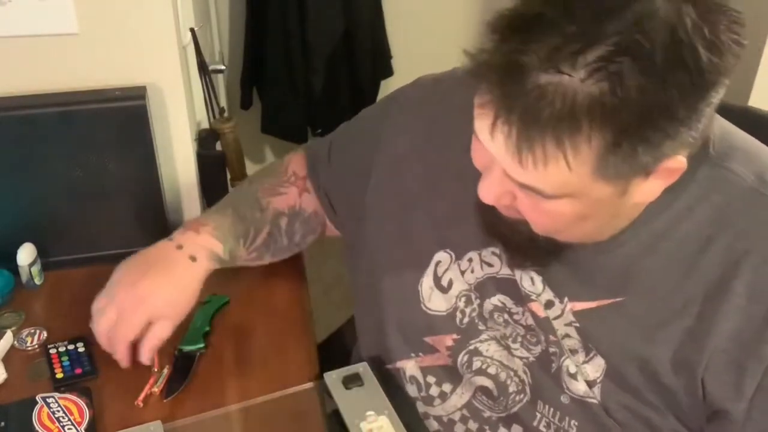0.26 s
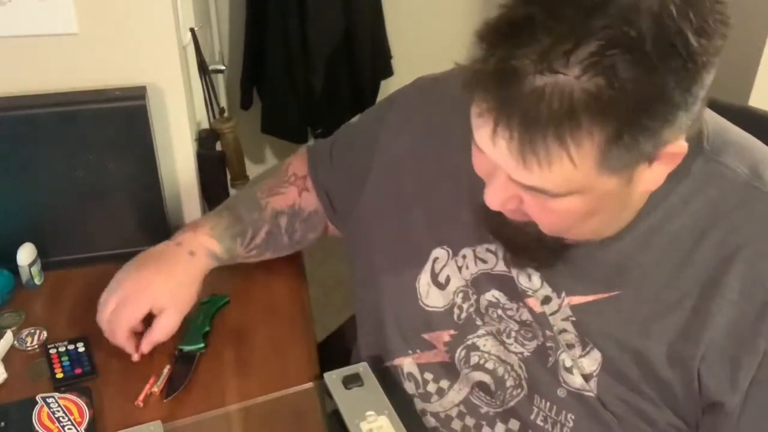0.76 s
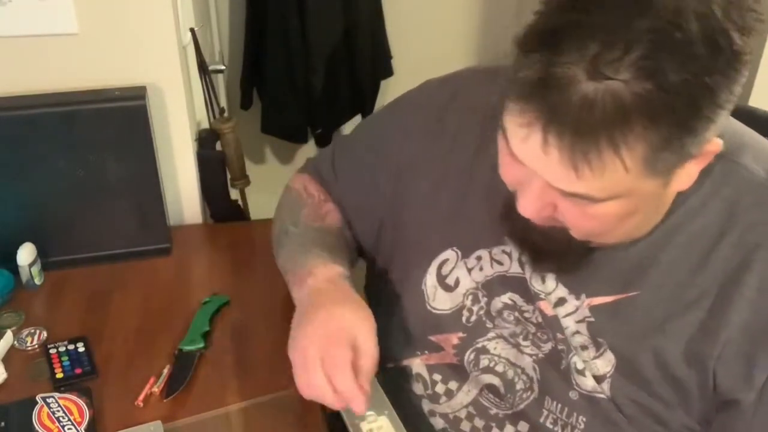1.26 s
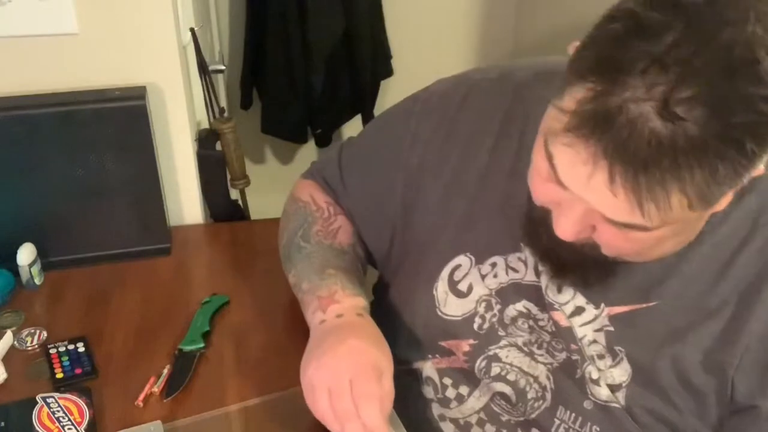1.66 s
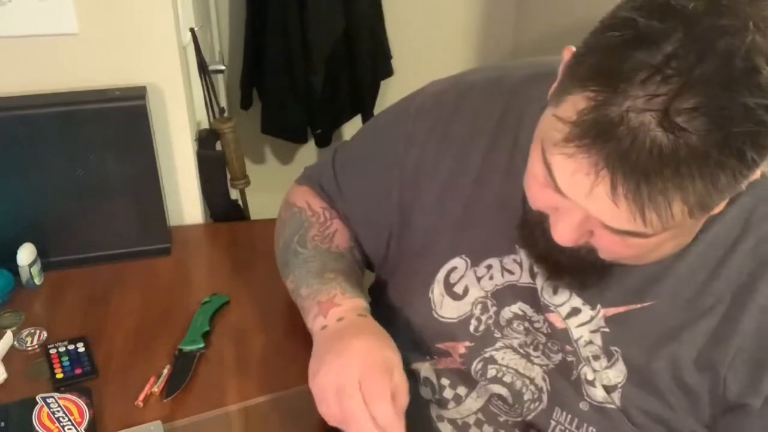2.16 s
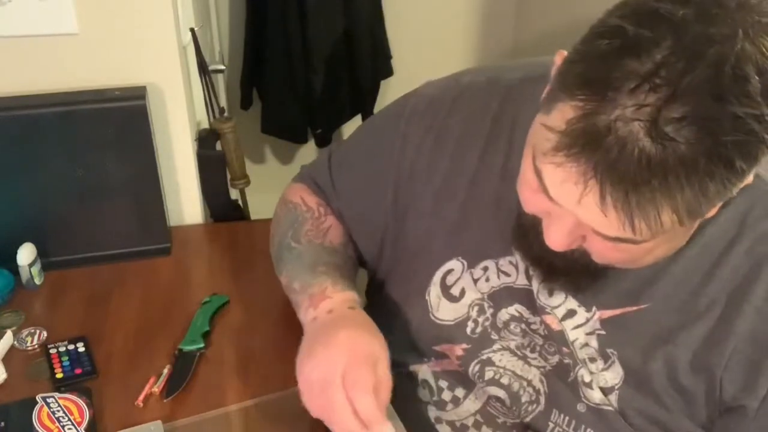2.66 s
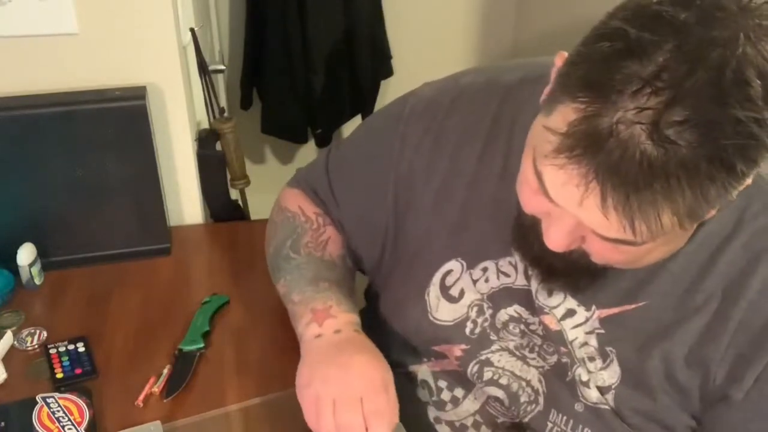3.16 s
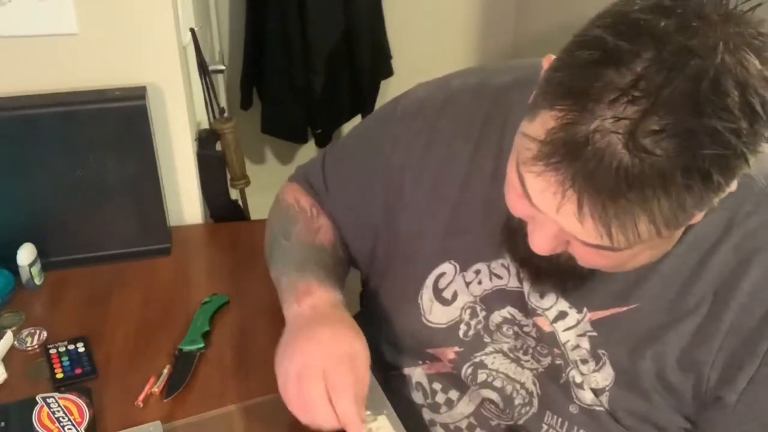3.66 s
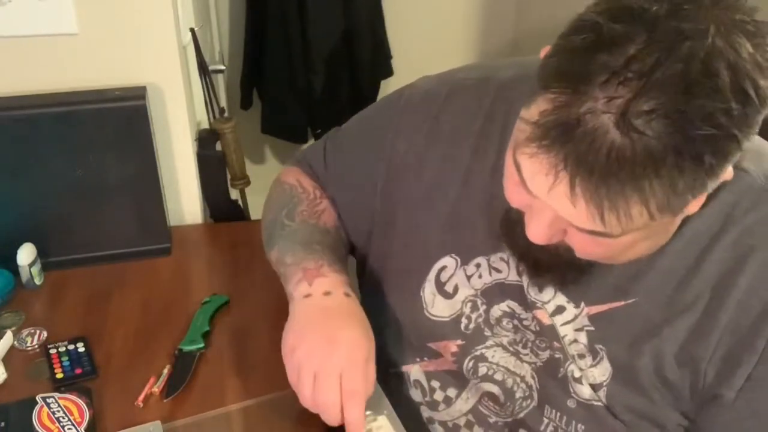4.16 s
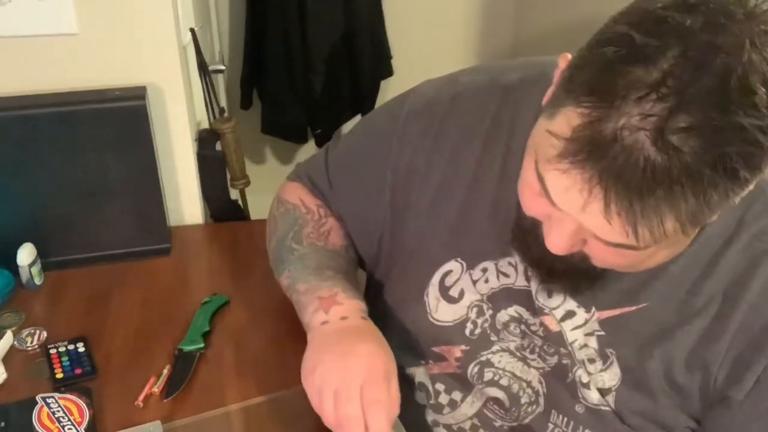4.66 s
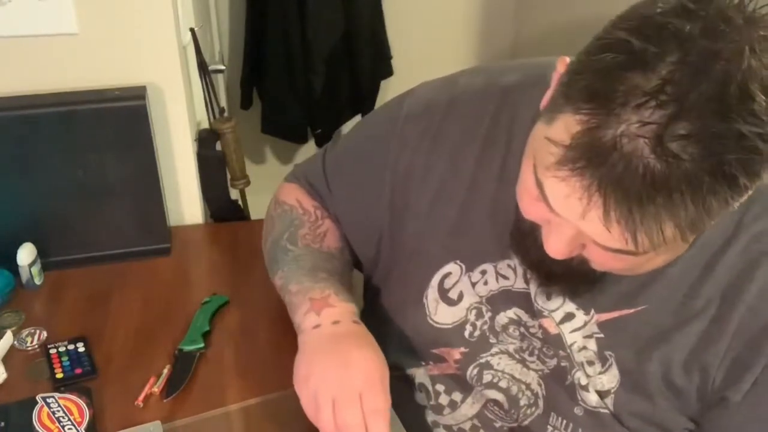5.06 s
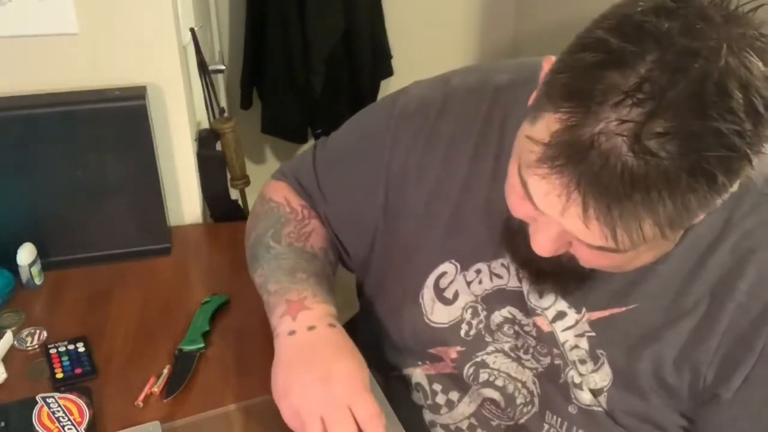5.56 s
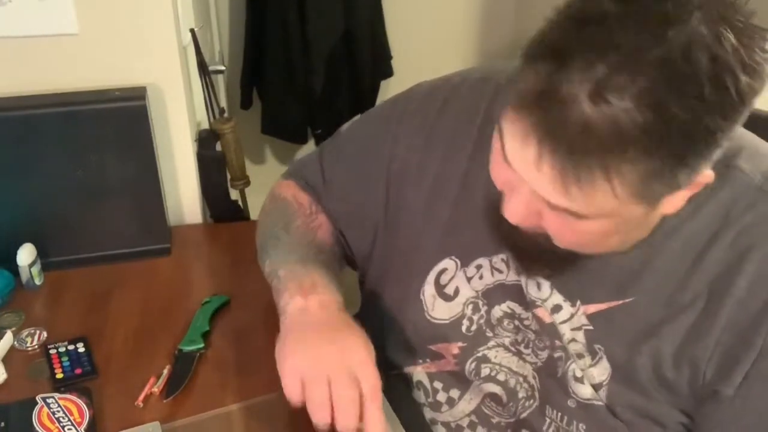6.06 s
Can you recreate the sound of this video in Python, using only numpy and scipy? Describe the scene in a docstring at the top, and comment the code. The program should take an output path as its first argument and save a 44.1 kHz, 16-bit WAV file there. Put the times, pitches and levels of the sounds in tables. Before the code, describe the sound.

Close up in a small, quiet room, fingers fit batteries into a thin plastic case. A soft tap on the wooden desk comes first, then light clicks and brief scrapes that build to loud snaps about halfway through. Irregular clicking goes on, with steel ticking against steel and the hardest pushes thumping the desk, ending in a fast run of clicks. A faint low hum and hiss lie underneath.

```python
"""Batteries into a plastic compartment

Fingers pick a battery off a wooden desk and push cells into a plastic case. Ticks, snaps and short
rattles ring its body and thin walls, steel cracks on steel, skin and metal scuff the plastic, and hard
pushes thump the desk. A small furnished room answers over low rumble, faint wavering hums and hiss."""
import sys
import numpy as np
from scipy import signal
from scipy.fft import rfft, irfft, next_fast_len
from scipy.io import wavfile
from scipy.ndimage import uniform_filter1d, map_coordinates

SR = 44100
rng = np.random.default_rng(int(sys.argv[2]) if len(sys.argv) > 2 else 0)


def dump(signal):
    """Clip the signal to [-1, 1] and save it as 16-bit WAV at the path in sys.argv[1]."""
    limited = np.clip(np.atleast_2d(signal).T, -1, 1)
    pcm = np.round(limited * 32767).astype(np.int16)
    wavfile.write(sys.argv[1], SR, pcm)


N = 278712


def amp(db):
    return 10 ** (np.asarray(db) / 20)


def unit_rms(x):
    return x / np.sqrt(np.mean(x ** 2) + 1e-20)


def unit_peak(x):
    return x / np.abs(x).max()


def log_interp(points, hz):
    """(frequency [Hz], value) points, read on a log axis."""
    knots_hz, values = np.transpose(points)
    return np.interp(np.log(hz + 1), np.log(knots_hz + 1), values)


def envelopes(rows):
    """One per-sample curve for each column after time."""
    times_s, *columns = np.transpose(rows)
    return [np.interp(np.arange(N) / SR, times_s, column) for column in columns]


def wobble(rate_hz):
    """Smooth random curve, rate_hz knots a second."""
    knots = rng.standard_normal(int(N * rate_hz / SR) + 4)
    return map_coordinates(knots, [np.arange(N) * rate_hz / SR])


def filtered(x, response):
    """x through a complex frequency response."""
    n = x.shape[-1]
    n_fft = next_fast_len(n + min(8192, n // 3))
    return irfft(rfft(x, n_fft) * response(np.fft.rfftfreq(n_fft, 1 / SR)), n_fft)[..., :n]


def resonances(modes, scatter_db=0):
    """Causal response of damped modes, alternating in sign, gains scattered at random."""
    offset_db = scatter_db * rng.standard_normal(len(modes))
    return lambda f: sum(
        (-1) ** k * amp(db + offset_db[k]) * 1j * f * width_hz / (hz * hz - f * f + 1j * f * width_hz)
        for k, (hz, width_hz, db) in enumerate(modes))


# Room sound, left against right: (frequency [Hz], coherence [0..1])
COHERENCE = [(60, 0.97), (200, .88), (400, 0.79), (700, 0.48), (1300, 0.33), (2400, 0.024), (5000, 0)]
def diffuse_stereo(x):
    """Two independent signals to left and right, alike in the bass."""
    def weights(hz):
        angle = np.arccos(np.clip(log_interp(COHERENCE, hz), -1, 1)) / 2
        return np.array([np.cos(angle), np.sin(angle)])
    mid, side = filtered(x, weights)
    return np.array([mid + side, mid - side])


def noise_band(hz, width_hz):
    """Narrow stereo noise, unit RMS."""
    noise = rng.standard_normal((2, N))
    return unit_rms(diffuse_stereo(filtered(noise, lambda f: resonances([(hz, width_hz, 0)])(f) ** 2)))


# House rumble: (time [s], deep band [dB], upper band [dB])
RUMBLE_LEVELS = [(0, -69, -62.5), (.9, -68.5, -61), (2.2, -65.5, -71), (2.43, -60, -63), (2.96, -67, -69.5),
                 (3.38, -59, -52), (3.7, -59, -70.5), (3.99, -62.5, -64), (4.21, -54.5, -58),
                 (4.36, -55.5, -82.5), (4.63, -64.5, -65.5), (5.37, -60.5, -61.5), (6.32, -65.5, -61)]
def rumble():
    """Deep and upper house rumble, wavering slightly."""
    deep_db, upper_db = envelopes(RUMBLE_LEVELS)
    deep = noise_band(hz=38.74, width_hz=27)
    upper = noise_band(hz=69.1, width_hz=21) + 0.42 * noise_band(hz=115, width_hz=39)
    return amp(wobble(9)) * (amp(deep_db) * deep + amp(upper_db) * upper)


# Hums: (time [s], low [dB], middle [dB], high [dB])
HUM_LEVELS = [(0, -75.5, -105, -90), (.5, -72, -84, -91), (.9, -81, -89, -105), (1.1, -69, -89, -105),
              (1.25, -94, -97.5, -105), (3.8, -85, -94, -105), (6.32, -82, -98, -105)]
def hums():
    """Three narrow noise bands that come and go."""
    low_db, middle_db, high_db = envelopes(HUM_LEVELS)
    return (amp(low_db) * noise_band(hz=311, width_hz=25)
            + amp(middle_db) * noise_band(hz=770, width_hz=60)
            + amp(high_db) * noise_band(hz=1470, width_hz=30))


# Room hiss: (frequency [Hz], relative density [dB])
HISS_SPECTRUM = [(82, -41), (140, -16.5), (212, -14), (268, -16), (302, -12.5), (367, -20), (625, -22.5),
                 (777, -18.5), (1170, -27), (1610, -28.5), (2850, -37), (3080, -37), (10900, -40.5),
                 (15500, -54.5)]
def hiss(level_db=-76):
    """Faint broadband noise, drifting in level."""
    noise = filtered(rng.standard_normal((2, N)), lambda hz: amp(log_interp(HISS_SPECTRUM, hz)))
    return amp(level_db + wobble(1.1)) * unit_rms(diffuse_stereo(noise))


def uneven_echoes(shape, depth_db):
    """Random gain over frequency and time: few surfaces echo unevenly."""
    field = uniform_filter1d(rng.standard_normal(shape), size=2, axis=0)
    return amp(depth_db * unit_rms(uniform_filter1d(field, size=14, axis=1)))


# Room decay: (frequency [Hz], T60 [s])
ROOM_T60 = [(300, 0.9), (1100, 0.47), (3000, 0.52), (8000, 0.36), (15000, 0.29)]
# Reverb send: (frequency [Hz], gain [dB])
ROOM_SEND = [(300, 3.5), (650, -9.5), (1200, -12.5), (3000, -9.5), (7000, -12.5), (14000, -15)]
def room(x):
    """Each band's energy drains as noise: fast from near surfaces, slowly from the room."""
    frames = dict(fs=SR, nperseg=512, noverlap=384)
    delayed = np.pad(x, (400, 0))[:N]
    hz, t, spectrum = signal.stft(delayed, **frames)
    power = uniform_filter1d(np.abs(spectrum) ** 2, size=2, axis=0)

    def drain(t60_s):
        retained = amp(-120 * t[1] / t60_s)  # power ratio per hop
        return np.array([signal.lfilter([1 - k], [1, -k], row) for k, row in zip(retained, power)])

    t60_s = log_interp(ROOM_T60, hz)
    energy = np.abs(drain(t60_s) + amp(6.5) * drain(0.36 * t60_s))
    noise = signal.stft(rng.standard_normal((2, N)), **frames)[2]
    noise /= np.sqrt(np.mean(np.abs(noise) ** 2))
    tail = noise * np.sqrt(energy) * amp(log_interp(ROOM_SEND, hz))[:, None]
    tail *= uneven_echoes(energy.shape, depth_db=2)
    return diffuse_stereo(signal.istft(tail, **frames)[1][:, :N])


# Desk top: (frequency [Hz], gain [dB], T60 [s])
DESK_MODES = [(70.6, -11.5, 0.056), (95, 5, 0.13), (161, -0.5, .12), (207, -5, 0.056), (287, -0.5, 0.1),
              (394.4, -3, 0.083), (504.7, 5.5, 0.023)]
# Pushes reaching the desk: (time [s], thump [dB], knock [dB])
DESK_PUSHES = [(0.535, -49, -34.5), (0.547, -62, -36.5), (1.843, -52.5, -41.5), (2.32, -54, -45),
               (2.535, -47, -53.5), (3.153, -58, -40), (3.222, -29, -26.5), (3.271, -55, -34),
               (3.388, -37.5, -31.5), (3.593, -49.5, -47.5), (4.124, -50, -65.5), (4.502, -45, -41),
               (4.553, -48, -41), (4.607, -53.5, -49), (4.899, -51, -43.5), (4.956, -43.5, -41),
               (5.14, -39, -48), (5.281, -33.5, -33), (5.3, -54, -38), (5.417, -35.5, -54.5),
               (5.789, -23, -32), (6.03, -42, -62), (6.051, -33.5, -42), (6.065, -35, -32)]
def desk_thumps(rise_s=0.014, scatter_db=1.2):
    """The desk top gives slowly, then rings: deep modes thump, upper ones knock."""
    desk, t = np.zeros((2, N + SR)), np.arange(SR // 3) / SR
    for start_s, thump_db, knock_db in DESK_PUSHES:
        offsets_db = scatter_db * rng.standard_normal((len(DESK_MODES), 2, 1))
        ring = np.zeros((2, len(t)))
        for (hz, gain_db, t60_s), offset_db in zip(DESK_MODES, offsets_db):
            level_db = gain_db + (thump_db if hz < 200 else knock_db) + offset_db
            ring += amp(level_db - 60 * t / t60_s) * np.sin(2 * np.pi * hz * t)
        desk[:, round(start_s * SR):][:, :len(t)] += ring * (1 - np.exp(-t / rise_s))
    return desk[:, :N]


# Steel on steel: (frequency [Hz], gain [dB])
STEEL_SPECTRUM = [(3000, -39.5), (4500, -9.5), (6000, -3.5), (8000, -2.5), (10500, -9), (13000, -12),
                  (15500, -15), (16000, -13)]
def steel_treble(x):
    """The bright colour of the steel contacts."""
    return filtered(x, lambda hz: amp(log_interp(STEEL_SPECTRUM, hz)) * (hz > 3000))


def bending_waves(x, lag_s):
    """Dispersion: highs travel fastest; 600 Hz trails 2400 Hz by lag_s."""
    return filtered(x, lambda hz: np.exp(-2j * np.pi * lag_s * (4 * np.sqrt(600 * hz) - hz)))


# Case body and thin walls: (frequency [Hz], width [Hz], gain [dB])
BODY_MODES = [(630, 42, -5.5), (929, 312, -8.5), (950.6, 104.6, -1), (1174, 50, -8), (1397, 233, -2.5),
              (1409.3, 186, 1.5), (1742, 98, -3.5), (1990, 370, -17)]
WALL_MODES = [(2170, 200, -6), (2573, 42, 2), (2932, 270, -4), (3517, 150, -1.5), (3878, 130, -0.5),
              (4292, 200, -0.5), (4933, 710, 2.5), (5450, 1500, 0)]
def case_ring(force, modes, top_hz, scatter_db=0, focus_hz=None, spread_oct=1):
    """Modes ring, hardest near focus_hz; a soft contact feeds little above top_hz."""
    if focus_hz:
        modes = [(hz, width_hz, db - 9 * min(np.log2(hz / focus_hz) ** 2 / spread_oct ** 2, 1.2))
                 for hz, width_hz, db in modes]
    response = resonances(modes, scatter_db)
    radiation = lambda hz: (1j * hz / (520 + 1j * hz)) ** 2  # too small to radiate bass
    return filtered(force, lambda hz: response(hz) / (1 + 1j * hz / top_hz) ** 3 * radiation(hz))


# Strokes on the plastic: (start [s], hold [s], body level [dB], walls [dB re body], hiss [dB re body])
SCUFF_STROKES = [(1.604, 0.065, -73.5, 2, -13), (1.826, .02, -65, -17, -25),
                 (1.992, 0.067, -68.5, -2.5, -16), (2.149, 0.1, -70, 2.5, -2),
                 (2.28, 0.023, -52.5, -15, -40), (2.759, 0.02, -69, 3, -1), (2.94, .01, -71, -56, -44),
                 (2.99, .02, -76, 0, -11), (4.044, 0.11, -63.5, -6.5, -16),
                 (4.192, 0.051, -60.5, -15.5, -26), (4.62, 0.022, -67.5, -0.5, -4.5),
                 (5.006, 0.11, -74.5, -3.5, -17), (5.151, 0.0094, -57, 5.5, 3.5),
                 (5.237, .025, -65, 5.5, -7), (5.47, 0.043, -70, -16, -6.5), (5.652, 0.0037, -72, -1.5, -6),
                 (5.703, 0.04, -80.5, -13, -19)]
def scuffs(ramp_db_per_s=499):
    """Dense tiny slips excite the case; its thin walls squeak in narrow bands."""
    t, gains = np.arange(N) / SR, np.zeros((3, N))
    for start_s, hold_s, level_db, wall_db, hiss_db in SCUFF_STROKES:
        outside_s = np.maximum(start_s - t, 0) + np.maximum(t - start_s - hold_s, 0)
        gains += amp(level_db - ramp_db_per_s * outside_s) * amp([[0], [wall_db], [hiss_db]])
    slips = rng.standard_normal((3, N)) * amp(1.5 * wobble(170) + 3 * wobble(22))
    body = case_ring(slips[0], BODY_MODES, top_hz=3000)
    walls = case_ring(slips[1], WALL_MODES, top_hz=4000, focus_hz=3390, spread_oct=0.66)
    squeak = filtered(walls, resonances(WALL_MODES))
    return np.sum(gains * [unit_rms(body), unit_rms(squeak), unit_rms(steel_treble(slips[2]))], axis=0)


# Contacts on the case:
# (time [s], body peak [dB], body focus [Hz], walls [dB re body], steel [dB re body], rattle T60 [s])
CASE_CONTACTS = [(0.524, -41, 890, -23, -42, 0.12), (.536, -45, 1040, -7, -38, 0.14),
                 (.782, -90.5, 724, -10, 36, .012), (1.205, -77, 783, -7, 15, 0.013),
                 (1.694, -57, 1010, -14, -30, 0.014), (1.841, -30.5, 910, -8.5, -23.5, 0.027),
                 (2.004, -48, 1590, -10, -25.5, 0.014), (2.264, -39, 1430, -12.5, -30, 0.028),
                 (2.322, -25, 1580, -5.5, -4.5, 0.015), (2.44, -25, 1600, -8.5, -3.5, 0.034),
                 (2.527, -31, 1166, 3.5, -2.5, 0.022), (2.533, -28, 1700, -17, -19, 0.013),
                 (2.912, -57.5, 1710, 1, 6, 0.078), (2.989, -66.5, 1670, 9.5, -6, 0.013),
                 (3.115, -31.5, 1910, 5.5, 10, 0.018), (3.15, -31, 1070, -4.5, -5, 0.084),
                 (3.203, -22.5, 1280, 8, 16.5, 0.07), (3.206, -20, 1450, -11, -12, .04),
                 (3.217, -12, 1110, -5.5, -21, 0.024), (3.226, -13, 1000, -8.5, 0, .005),
                 (3.267, -22, 1300, -8, -18.5, 0.051), (3.384, -7.5, 1650, -3.5, 1, 0.022),
                 (3.39, -23, 1019, -10, -12.5, 0.052), (3.404, -11, 1510, -4.5, -7.5, 0.021),
                 (3.591, -40, 1533, 9, 3.5, 0.028), (4.034, -46, 1756, 9.5, -20, 0.09),
                 (4.127, -56, 1700, 6.5, -18, .013), (4.501, -26, 1574, -6.5, -14, 0.057),
                 (4.552, -31, 890, -11, -28.5, 0.018), (4.578, -38.5, 1000, -6.5, 2, 0.038),
                 (4.605, -32, 1600, -12, -24, .006), (4.712, -33.5, 1223, -13, -12.5, 0.03),
                 (4.893, -32, 1740, -3, -13.5, 0.026), (4.895, -26, 1050, -29, -11.5, .008),
                 (4.954, -21.5, 1570, -12, -17, 0.035), (5.118, -41, 1770, -11.5, -16.5, .042),
                 (5.138, -19, 1440, -10.5, -26, 0.0042), (5.272, -8.5, 1760, -1, -10, 0.019),
                 (5.416, -22.5, 1040, -1, -20.5, 0.0062), (5.63, -36.5, 1037, 2, -4, 0.0073),
                 (5.788, -7.5, 1350, -0.5, -3.5, 0.029), (6.007, -35.5, 1060, -1, -3, 0.1),
                 (6.03, -16.5, 1460, -8, -9.5, 0.017), (6.043, -19, 1760, 2.5, 6.5, 0.082),
                 (6.05, -18.5, 1660, 0.3, 4.5, 0.0093), (6.063, -20.5, 1210, -27, -1, 0.012)]
def contacts(scrape_db=-18, scrape_rise_db_per_s=60 / 0.029, rattle_rise_s=0.00068, steel_t60_s=0.12):
    """A scrape swells into each contact; a firm blow and a dying rattle ring body and walls."""
    case, t = np.zeros(N + SR), np.arange(-SR // 50, SR // 12) / SR
    after_s = np.maximum(t, 0)
    tilt_db = np.array([[3], [0], [-9]])  # body, walls, steel: scrapes are duller than blows
    scrape = amp(scrape_db + scrape_rise_db_per_s * np.minimum(t, 0) + tilt_db) * (t < 0)
    for time_s, peak_db, body_hz, wall_db, steel_db, t60_s in CASE_CONTACTS:
        decay = amp(-60 * after_s / t60_s) * (1 - np.exp(-after_s / rattle_rise_s))
        rattle = rng.standard_normal((3, len(t))) * (decay + scrape)
        # Weaker contacts: less blow, duller walls.
        blow = amp(8.5 + 0.29 * peak_db) * np.exp(-((t - 0.001) / 0.00008) ** 2)
        wall_top_hz = 8500 * amp(0.085 * peak_db)
        body = case_ring(rattle[0] + blow, BODY_MODES, top_hz=3040, scatter_db=2, focus_hz=body_hz)
        body = bending_waves(body, lag_s=0.003)
        walls = case_ring(rattle[1] + blow, WALL_MODES, wall_top_hz,
                          scatter_db=2, focus_hz=2910, spread_oct=1.1)
        crack = steel_treble(rattle[2] * amp(-60 * after_s / steel_t60_s))
        snap = unit_peak(body) + amp(wall_db) * unit_peak(walls) + amp(steel_db) * unit_peak(crack)
        case[round((time_s + t[0]) * SR):][:len(t)] += amp(peak_db) * snap
    return case[:N]


def scene():
    """Case slightly right (louder and earlier there), desk slightly left; both feed the room."""
    case, desk = contacts() + scuffs(), desk_thumps()
    pan_db, delay_s = [[-0.7], [0.7]], np.array([[0.00007], [0]])
    direct = filtered(case, lambda hz: amp(pan_db) * np.exp(-2j * np.pi * hz * delay_s))
    direct += desk * amp([[0.5], [-0.5]])
    reverb = room(case + amp(-16) * desk[0])
    return direct + reverb + rumble() + hums() + hiss()


def record(dry):
    """The right channel's top treble feeds both sides, slightly later on the right; steep low-pass."""
    crossover_hz, cutoff_hz, lag_samples = 7240, 16400, 18
    lowpass = lambda hz: 1 / (1 + (hz / crossover_hz) ** 16)
    highpass = lambda hz: np.sqrt(1 - lowpass(hz) ** 2)
    phase_rad = lambda hz: (np.pi * hz * lag_samples / SR - 1.15) * np.array([[1], [-1]])
    treble = filtered(dry[1], lambda hz: highpass(hz) * np.exp(1j * phase_rad(hz)))
    return filtered(filtered(dry, lowpass) + treble, lambda hz: 1 / (1 + (hz / cutoff_hz) ** 200))


dry = scene()
out = record(dry)
dump(out)
```